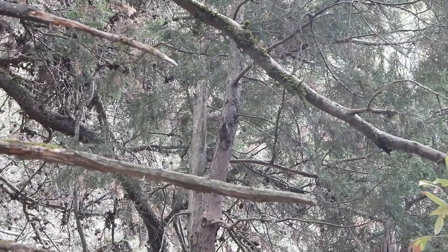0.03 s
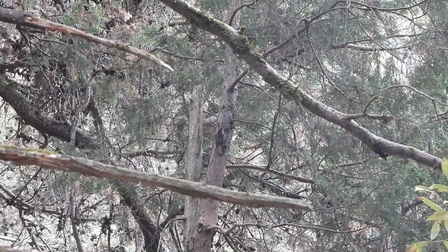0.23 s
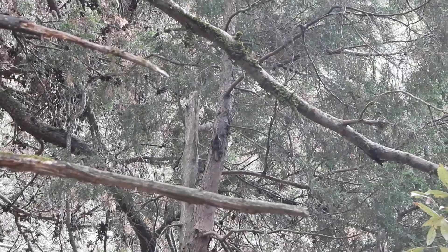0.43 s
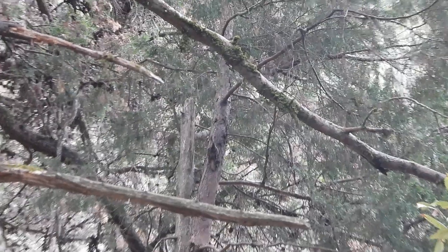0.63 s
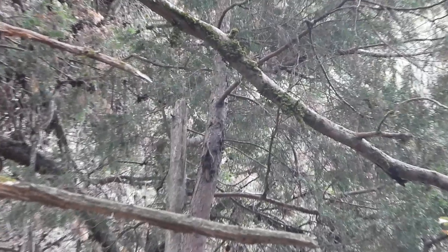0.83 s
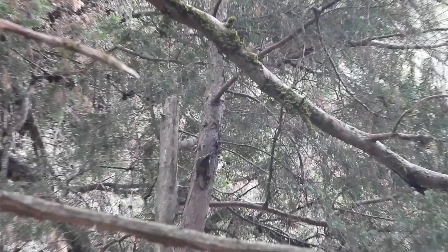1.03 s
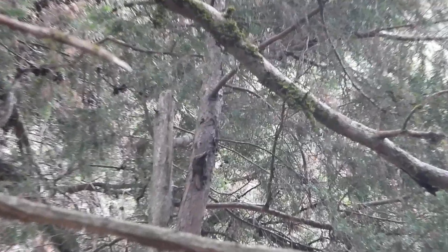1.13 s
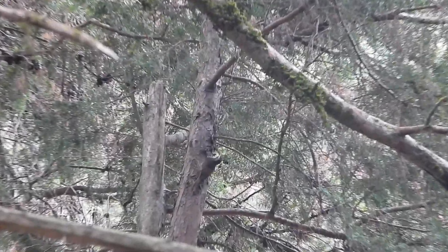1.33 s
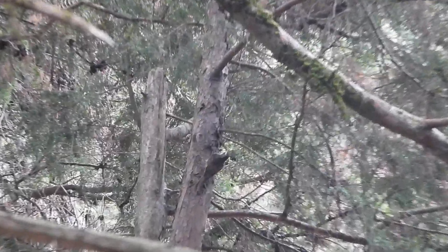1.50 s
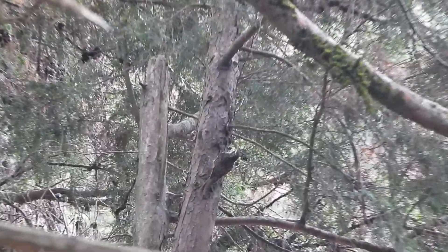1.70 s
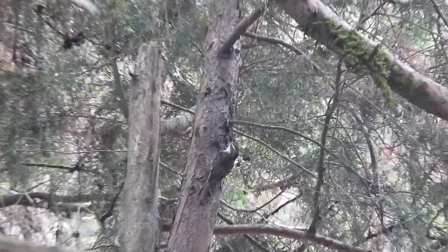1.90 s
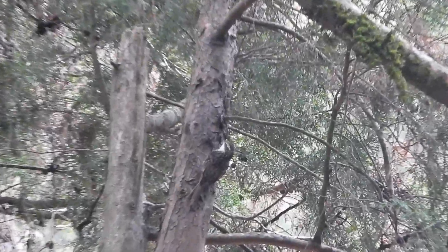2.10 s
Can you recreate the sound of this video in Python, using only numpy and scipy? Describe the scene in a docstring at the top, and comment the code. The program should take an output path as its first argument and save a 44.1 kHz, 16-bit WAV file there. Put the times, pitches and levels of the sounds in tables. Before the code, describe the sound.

A small bird sings seven evenly spaced pairs of high, thin downward whistles from 0.1 to 1.3 seconds, about six pairs a second, ringing diffusely among conifer trunks. Close by, quiet camera shutter clatters come near 0.3, 0.65, 1.0 and 1.35, with tiny handling ticks. From 0.7 a thin lens motor whirrs steadily to the end, over faint outdoor hiss and low drone. The sound fades in.

```python
"""Birdsong and camera in a conifer wood

A small bird sings seven pairs of falling whistles: gliding near sines, scattered back by the trunks.
Close by, a camera shutter cycles four times, as impacts ringing its resonances; a lens motor then whirrs
as resonated noise. Handling ticks and knocks are damped rings. Under them lie random-spectrum outdoor
hiss, a low drone that swells in and a trace of rumble. The sound fades in."""
import sys
import numpy as np
from scipy import signal
from scipy.io import wavfile
from scipy.ndimage import uniform_filter1d

SR = 44100
rng = np.random.default_rng(int(sys.argv[2]) if len(sys.argv) > 2 else 0)


def int16_out(signal):
    """Quantize to a 16-bit WAV file."""
    q = np.round(np.clip(np.atleast_2d(signal).T, -1, 1) * 32767)
    wavfile.write(sys.argv[1], SR, q.astype(np.int16))


def magnitude_from_level(level_db):
    """Linear magnitude for a level in decibels (20 dB per decade)."""
    exponent = np.asarray(level_db, float) / 20
    return 10 ** exponent


N = 94815

# Outdoor hiss, before its overall scaling: pitch_hz, relative_density_db
HISS_SPECTRUM = [(24, -50), (70, -43), (185, -13), (270, -16.5), (385, -7.5), (490, -15.5), (700, -10),
                 (1150, -12.5), (1950, -15), (3000, -19), (4300, -10), (5300, -19), (6600, -26.5),
                 (7500, -31.5), (16000, -97)]
HISS_DB = -45.5
# Left-right likeness of the diffuse noises: pitch_hz, correlation (-1 to 1)
LIKENESS = [(60, 1), (180, 0.67), (550, 0.6), (1650, 0.58), (4970, -0.63), (15000, 0.061)]
# Left-right balance of the diffuse noises: pitch_hz, left_minus_right_db
BALANCE = [(100, 2.5), (380, -7), (1300, 1.5), (2400, -7.5), (4400, 10), (8000, -3.5), (15000, -7.5)]

# Short whistles, before weighting by pitch: start_s, top_hz, knee_s (after the start), level_db
SHORT_WHISTLES = [(.110, 5580, .011, -22), (.275, 5270, 0.011, -18), (.443, 5200, 0.011, -18),
                  (.614, 5540, 0.012, -24), (.794, 5850, 0.013, -27), (.966, 5310, 0.012, -24.5),
                  (1.162, 5150, 0.008, -22.5)]
# Long whistles, as above, with: split (0 whole, 1 parted into two accents)
LONG_WHISTLES = [(.144, 6880, 0.032, -18.5, 1), (.319, 6700, 0.026, -16, 0.75), (.486, 6750, 0.03, -19, 1),
                 (.660, 6967, 0.027, -23.5, 0.1), (0.833, 6900, .033, -22, 0.04),
                 (1.012, 6940, 0.03, -23.5, 0.64), (1.204, 6800, 0.024, -22, 0.17)]
# Direct strength along the glide: pitch_hz, whole_db, split_db
BEAK = [(3300, -28, -28), (3900, -19, -19), (4400, -12, -12), (4700, -12, -11), (4930, -10, -7),
        (5120, -1, 2), (5330, 1, -6), (5570, 1, -5), (5830, -3, 0), (6000, -14, -1), (6400, -21, -14),
        (7000, -22, -24)]
# Strength towards the trunks: pitch_hz, level_db
SCATTER = [(3300, -23.5), (4400, -8.5), (4800, 0), (5200, -3), (5800, -7.5), (6200, -10), (7000, -16)]
# Direct sound as the head turns away: time_s, level_db
HEAD_TURN = [(.1, -19), (.15, -7), (.27, 0), (1.1, 0), (1.17, -8), (1.2, -1.5)]
# Long whistles ease into a knee, short ones reach it ever faster; then both drop to a foot
KNEE_HZ, FALL_HZ_PER_S = 5075, 56000
SHORT_BEND, SHORT_FALL_S, SHORT_FOOT_HZ, SHORT_SCATTER_DB = 0.9, 0.023, 4350, -3
LONG_BEND, LONG_FALL_S, LONG_FOOT_HZ = 1.4, 0.035, 3350
ATTACK_S, RELEASE_S = 0.007, 0.0035
WAVER = 0.0053  # rms share of the pitch
FLUTTER_DB, FLUTTER_S = 4, 0.003
BIRD_PAN_DB, BIRD_LAG_S = -2, 0.000026  # left minus right; left side late
NEAR_DB, NEAR_T60_S, FAR_DB, FAR_T60_S = -0.5, 0.23, -6.5, 0.94  # near trunks, far wood
WOOD_GAP_S, WOOD_LIKENESS = 0.007, 0.5

# Shutter cycles: start_s, level_db
SHUTTER_CYCLES = [(0.289, -40.5), (0.635, -46.5), (.985, -47.5), (1.329, -48.5)]
# Bursts in one cycle: offset_s, length_s (peak at half), bright_rattle_db, body_knock_db
SHUTTER_BURSTS = [(-.006, 0.018, -25, 5.5), (0.01, .014, -0.5, 9), (0.0229, 0.0098, 4, -4),
                  (0.033, .02, -10, -8), (.050, 0.017, -5, 2), (0.06, 0.041, -5.5, 0.5),
                  (0.08, 0.0078, 9, -11), (0.097, 0.018, -35, -40), (.107, 0.0091, -31, -38)]
# Resonances of the blades: pitch_hz, width_hz (each pass), relative_level_db
BLADES = [(6900, 1600, 1), (7455, 1080, 10), (8290, 480, 7), (8850, 1400, 9), (11000, 320, -5.5),
          (12500, 650, -12), (15000, 1500, -55)]
# Resonances of the camera body: pitch_hz, width_hz (each pass), relative_level_db
BODY = [(474, 165, 1), (800, 440, 9.5), (1214, 610, 10.5), (1580, 460, 10.5), (2220, 930, 12.5),
        (3860, 2060, 9)]
IMPACTS_PER_S, IMPACT_SPREAD_DB = 18000, 2.5
SCRATCH_DB, SCRATCH_S = 1.8, 0.004
RUSTLE_DB, RUSTLE_T60_S = -8.5, 1

# Ticks and knocks: start_s, pitch_hz, t60_s, relative_level_db
KNOCKS = [(.354, 769, 0.086, -38), (.361, 910, 0.019, -32), (0.475, 1153, 0.077, -49.5),
          (0.502, 1720, 0.016, -29.5), (.501, 2800, 0.013, -36), (.527, 1550, 0.013, -31.5),
          (.566, 690, 0.024, -44), (0.608, 1480, 0.036, -46), (0.708, 406, 0.079, -49),
          (1.055, 898, 0.048, -41.5), (1.123, 297, 0.014, -39.5), (1.545, 415, 0.08, -48),
          (1.752, 374, 0.21, -53), (1.804, 230, 0.042, -48), (2.013, 413, 0.055, -45)]
KNOCK_RISE_S = 0.0007

# Low drone, before its overall scaling: pitch_hz, relative_density_db
DRONE_SPECTRUM = [(50, -36), (90, -11), (150, 8), (300, -7), (420, -24), (700, -100)]
DRONE_DB, DRONE_ON_S, DRONE_RISE_S = -63, 0.46, 0.14

# Resonances of the lens barrel: pitch_hz, width_hz (each pass), relative_level_db
BARREL = [(896.6, 11, -10.5), (1451, 110, -5), (1475, 150, -4.5), (1634.5, 47, -3), (2585, 310, -8),
          (3340, 28, -12), (3990, 34, -2.5), (4860, 780, -1.5)]
# Fine gear hiss, before its overall scaling: pitch_hz, relative_density_db
GEAR_SPECTRUM = [(4200, -60), (5200, -1), (6200, 2), (7200, -8), (8000, -3), (9100, -15), (10300, -6.5),
                 (11500, -19.5), (13200, -15.5), (13700, -23), (14200, -84)]
MOTOR_ON_S, MOTOR_RISE_S, WHIRR_DB, GEAR_DB = 0.68, 0.095, -45.5, -53.5
THROB_HZ, THROB_DEPTH, THROB_DRIFT = 51.8, 0.047, 0.0083
WANDER, WANDER_S = 0.02, 0.06

RUMBLE_DB = -89
FADE_START_S, FADE_EDGE_S, FADE_FROM_DB, FADE_S = 0.08, 0.037, -11, 0.63
LOW_CUT_HZ, HIGH_CUT_HZ = 133, 15700


def read(points, hz):
    """Interpolation on a logarithmic frequency axis."""
    f, value = np.transpose(points)
    return np.interp(np.log(hz + 1), np.log(f + 1), value)


def evened(x):
    """Normalization to unit rms."""
    return x / np.sqrt(np.mean(x ** 2) + 1e-20)


def smooth_noise(count, size):
    """Moving average of white noise, normalized to unit rms."""
    return evened(uniform_filter1d(rng.standard_normal(count), size=size))


def add(mix, start_s, sound):
    """Superposition of a sound at a given time."""
    part = mix[round(start_s * SR):][:len(sound)]
    part += sound[:len(part)]


def ring(x, modes, order):
    """Modal resonance: parallel one-pole complex resonators, each passed order times."""
    out = 0
    for hz, width, db in modes:
        radius = np.exp(-np.pi * width / SR)
        pole = radius * np.exp(2j * np.pi * hz / SR)
        y = x + 0j
        for _ in range(order):
            y = signal.lfilter([1 - radius], [1, -pole], y)
        out = out + magnitude_from_level(db) * y.real / np.sqrt(width)
    return out


def spread(common, left, right, same):
    """Partial correlation: two channels share a part of their power."""
    same = np.clip(same, 0, 1)
    shared = np.sqrt(same) * common
    return np.array([shared + np.sqrt(1 - same) * left, shared + np.sqrt(1 - same) * right])


def wash(spectrum, db, patchy_db):
    """Diffuse noise: random short-time spectra, shaped in frequency, with drifting patches of level."""
    frames, hz = N // 256 + 5, np.fft.rfftfreq(1024, 1 / SR)
    a, b, c, d, patches = rng.standard_normal((frames, 513, 5)).T
    patches = uniform_filter1d(patches, size=10, axis=0)
    patches = evened(uniform_filter1d(patches, size=10, axis=1))
    same = np.clip(read(LIKENESS, hz), -1, 1)[:, None]
    lean = read(BALANCE, hz)[:, None] / 2
    left = a + 1j * b
    right = same * left + np.sqrt(1 - same ** 2) * (c + 1j * d)
    z = np.array([left * magnitude_from_level(lean), right * magnitude_from_level(-lean)])
    z *= magnitude_from_level(read(spectrum, hz)[:, None] + patchy_db * patches)
    noise = signal.istft(z, nperseg=1024, noverlap=768)[1][:, :N]
    return magnitude_from_level(db) * evened(noise)


def hiss():
    """Stationary broadband noise: the faint outdoor background."""
    return wash(HISS_SPECTRUM, HISS_DB, 3.0)


def rumble():
    """Low-frequency noise: a faint, steady trace."""
    return wash([(20, -28), (60, -16), (140, -46), (400, -76)], RUMBLE_DB, 1.5)


def whistle(top_hz, knee_s, db, split, bend, fall_s, foot_hz):
    """Frequency modulation: a near sine glides down to its foot, its strength following its pitch."""
    t = np.arange(0, knee_s + fall_s, 1 / SR)
    above_knee = (top_hz - KNEE_HZ) * np.clip(1 - t / knee_s, 0, 1) ** bend
    drop = FALL_HZ_PER_S * np.maximum(t - knee_s, 0)
    hz = np.maximum(KNEE_HZ + above_knee - drop, foot_hz)
    hz = uniform_filter1d(hz, size=180, mode="nearest")
    waver = 1 + WAVER * smooth_noise(4000, 60)[:len(t)]
    edge = np.clip(np.minimum(t / ATTACK_S, (t[-1] - t) / RELEASE_S), 0, 1)
    edge = np.sin(np.pi / 2 * edge) ** 2
    tone = edge * magnitude_from_level(db) * np.sin(2 * np.pi * np.cumsum(hz * waver) / SR)
    beak = [(f, whole + split * (parted - whole)) for f, whole, parted in BEAK]
    # below the knee the direct tone breaks up
    flutter = np.minimum(smooth_noise(4000, round(FLUTTER_S * SR))[:len(t)], 1)
    broken = magnitude_from_level(FLUTTER_DB * flutter * np.clip((t - knee_s) / ATTACK_S, 0, 1))
    return tone * broken * magnitude_from_level(read(beak, hz)), tone * magnitude_from_level(read(SCATTER, hz))


def wood(x):
    """Multiple scattering: convolution with decaying noise tails of the near trunks and the far wood."""
    t = np.arange(SR) / SR
    turn = np.arange(N) / SR * 4.33
    rise = np.clip(t / WOOD_GAP_S - 0.3, 0, 1)
    decay = magnitude_from_level(-60 * t / np.array([NEAR_T60_S, FAR_T60_S])[:, None, None])
    out = 0
    for k in range(3):  # three tails a side take turns
        taps = rng.standard_normal((2, 3, SR)) * rise * decay
        near, far = taps / np.linalg.norm(taps, axis=2, keepdims=True)
        tail = spread(*(magnitude_from_level(NEAR_DB) * near + magnitude_from_level(FAR_DB) * far), WOOD_LIKENESS)
        share = np.sqrt(2 / 3) * np.cos(np.pi * (turn + k / 3))
        out = out + signal.fftconvolve((x * share)[None], tail, axes=1)[:, :N]
    return out


def bird():
    """Direct and scattered fields: the whistles arrive straight and by way of the trunks."""
    song, thrown = np.zeros((2, N))
    short = [(*row, 0.5, SHORT_BEND, SHORT_FALL_S, SHORT_FOOT_HZ) for row in SHORT_WHISTLES]
    long = [(*row, LONG_BEND, LONG_FALL_S, LONG_FOOT_HZ) for row in LONG_WHISTLES]
    for rows, scatter_db in ((short, SHORT_SCATTER_DB), (long, 0)):
        for start, *shape in rows:
            direct, scattered = whistle(*shape)
            add(song, start, direct * magnitude_from_level(np.interp(start, *np.transpose(HEAD_TURN))))
            add(thrown, start, scattered * magnitude_from_level(scatter_db))
    lag = np.exp(-2j * np.pi * np.fft.rfftfreq(N, 1 / SR) * BIRD_LAG_S)
    late = np.fft.irfft(np.fft.rfft(song) * lag, N)
    return (np.array([late, song]) + wood(thrown)) * magnitude_from_level([[BIRD_PAN_DB / 2], [-BIRD_PAN_DB / 2]])


def shutter():
    """Impact excitation: bursts of tiny impacts ring the blades and the camera body."""
    t, bright, low = np.arange(N) / SR, 0, 0
    for start, db in SHUTTER_CYCLES:
        # a faint rustle swells in with each cycle and dies away after it
        swell = np.clip((t - start + 0.024) / 0.049, 0, 1) ** 2
        rustle_db = RUSTLE_DB - 60 * np.maximum(t - start, 0) / RUSTLE_T60_S
        bright = bright + swell * magnitude_from_level(db + rustle_db)
        for offset, length, bright_db, low_db in SHUTTER_BURSTS:
            u = np.maximum(t - start - offset, 0) / length
            burst = (2 * u * np.exp(1 - 2 * u)) ** 2 * magnitude_from_level(db)
            bright = bright + burst * magnitude_from_level(bright_db)
            low = low + burst * magnitude_from_level(low_db)
    struck = rng.random((2, 1, N)) < IMPACTS_PER_S / SR
    size = struck * magnitude_from_level(IMPACT_SPREAD_DB * np.minimum(rng.exponential(1, (2, 1, N)), 3))
    # the rattle swells unevenly
    scratch = smooth_noise((2, 1, N), round(SCRATCH_S * SR))
    thin, thick = rng.standard_normal((2, 3, N)) * size * magnitude_from_level(SCRATCH_DB * scratch)
    blades = ring(thin * bright, BLADES, order=2) / ring(thin, BLADES, order=2).std()
    body = ring(thick * low, BODY, order=3) / ring(thick, BODY, order=3).std()
    return spread(*blades, 0.78) * magnitude_from_level([[1.5], [-1.5]]) + spread(*body, 0.7)


def knocks():
    """Damped free vibration: each tick or knock is one short decaying sine."""
    out, t = np.zeros(N), np.arange(6000) / SR
    for start, hz, t60, db in KNOCKS:
        envelope = (1 - np.exp(-t / KNOCK_RISE_S)) ** 2 * magnitude_from_level(db + 8.5 - 60 * t / t60)
        add(out, start, envelope * np.sin(2 * np.pi * hz * t))
    return out * magnitude_from_level([[-1.5], [1.5]])


def drone():
    """Low-band noise under a linear swell: a low drone comes in."""
    swell = np.clip((np.arange(N) / SR - DRONE_ON_S) / DRONE_RISE_S, 0, 1)
    return wash(DRONE_SPECTRUM, DRONE_DB, 1.9) * swell


def motor():
    """Modulated resonance: gear noise rings the barrel, throbbing with the shaft, over gear hiss."""
    t = np.arange(N) / SR
    shaft_hz = THROB_HZ * (1 + THROB_DRIFT * smooth_noise(N, 4000))
    throb = 1 + THROB_DEPTH * np.sin(2 * np.pi * np.cumsum(shaft_hz) / SR)
    noise = rng.standard_normal((3, N)) * throb
    # the five low resonances slide about as the barrel turns
    size = round(WANDER_S * SR)
    slide = evened(uniform_filter1d(smooth_noise(N, size), size=size))
    at = np.cumsum(1 + WANDER * (slide - slide.mean()))
    low = [np.interp(at, np.arange(N), y) for y in ring(noise, BARREL[:5], order=2)]
    high = ring(noise, BARREL[5:], order=2)
    whirr = evened(spread(*low, 0.97) + spread(*high, 0.36))
    whirr = magnitude_from_level(WHIRR_DB) * whirr * magnitude_from_level([[-1.0], [1.0]])
    gears = wash(GEAR_SPECTRUM, GEAR_DB, 3.6)
    return (whirr + gears) * np.clip((t - MOTOR_ON_S) / MOTOR_RISE_S, 0, 1)


def scene():
    """Superposition of all sources at the microphones."""
    return hiss() + bird() + shutter() + knocks() + drone() + motor()


def band_limit(x):
    """A steep low-pass at the top of the band."""
    return signal.sosfilt(signal.butter(12, 15690, fs=SR, output="sos"), x)


def record(dry):
    """Linear filtering and gain: low and high cut, a fade-in, and a trace of steady rumble."""
    t = np.arange(N) / SR - FADE_START_S
    edge = np.clip(t / FADE_EDGE_S, 0, 1) ** 2
    floor = magnitude_from_level(FADE_FROM_DB)
    fade = edge * (floor + (1 - floor) * np.clip(t / FADE_S, 0, 1) ** 3.4)
    cut = signal.sosfilt(signal.butter(4, LOW_CUT_HZ, "high", fs=SR, output="sos"), dry)
    cut = signal.oaconvolve(cut, signal.firwin(511, HIGH_CUT_HZ, fs=SR)[None], "same")
    mix = cut * fade + edge * rumble()
    return band_limit(mix)


dry = scene()
out = record(dry)
int16_out(out)
```